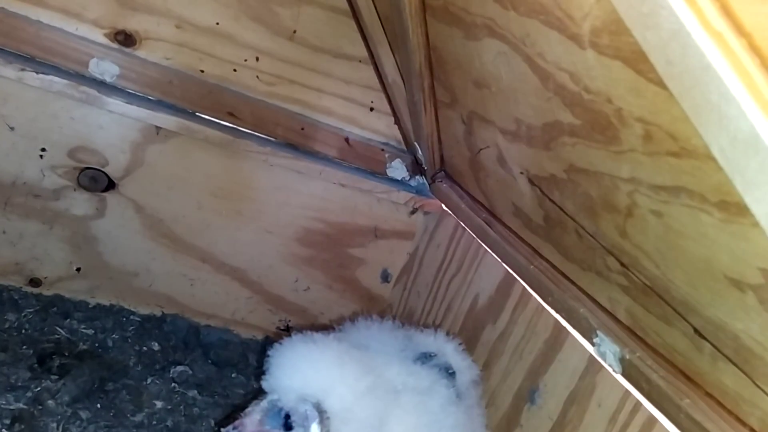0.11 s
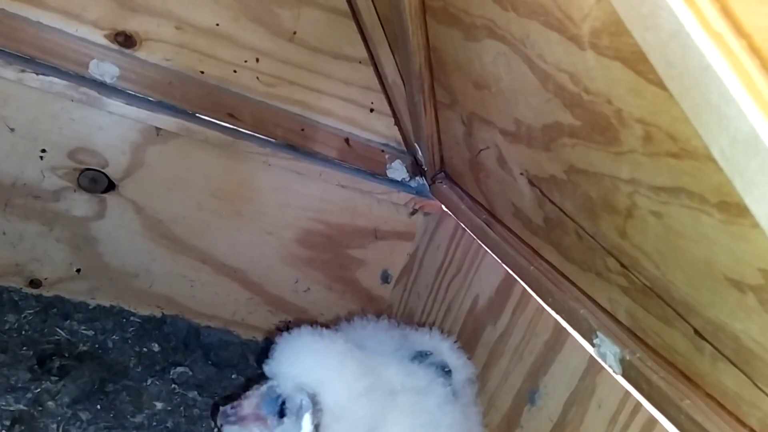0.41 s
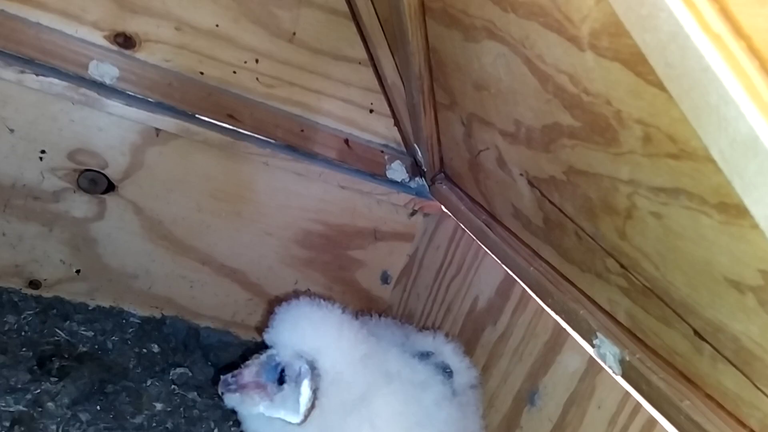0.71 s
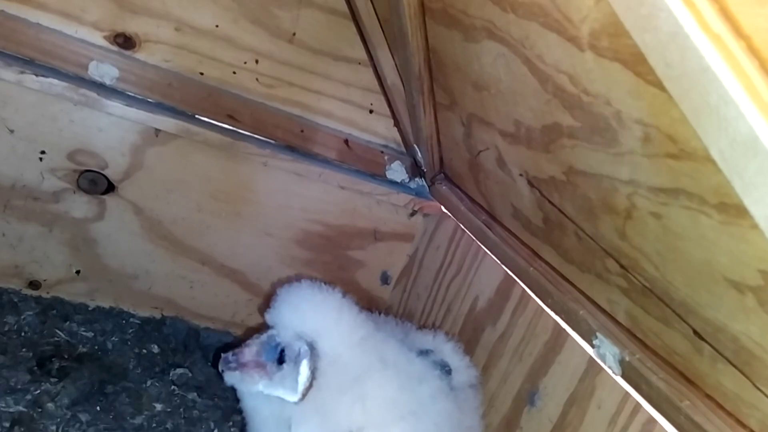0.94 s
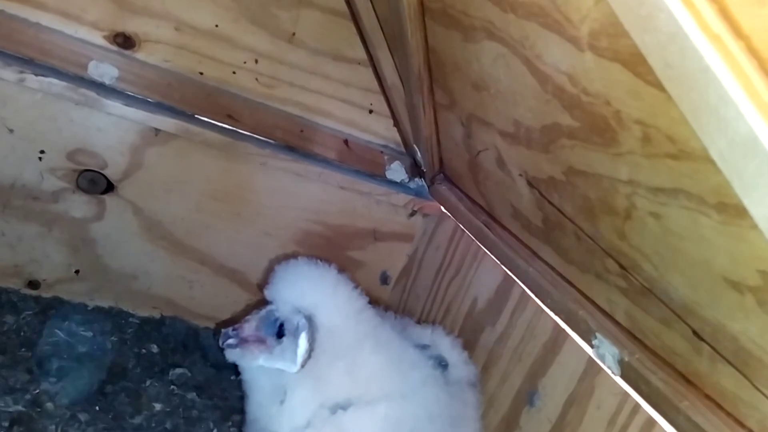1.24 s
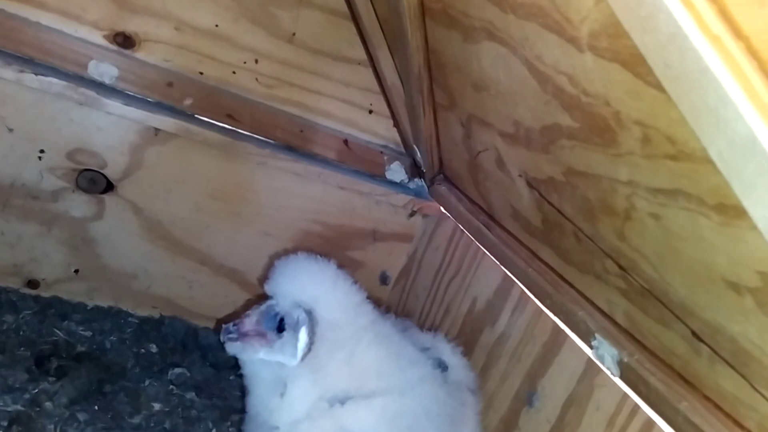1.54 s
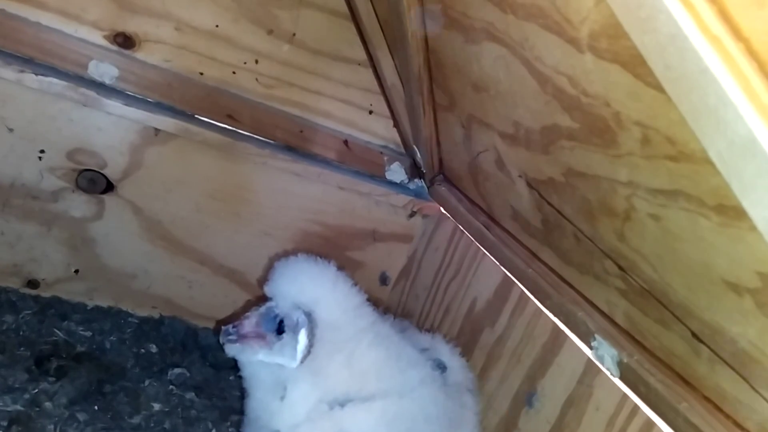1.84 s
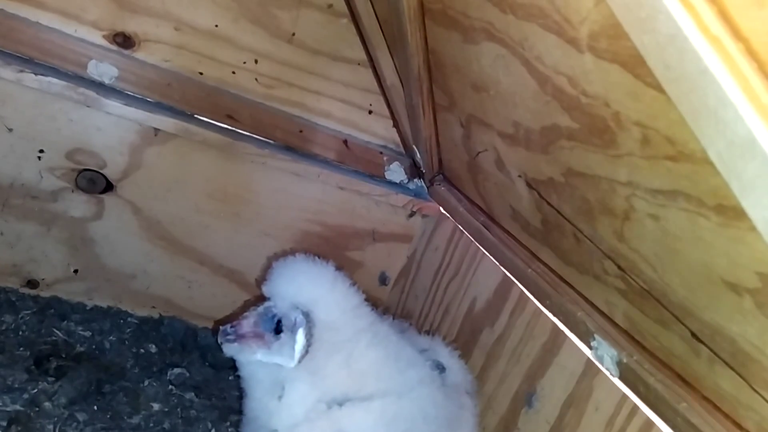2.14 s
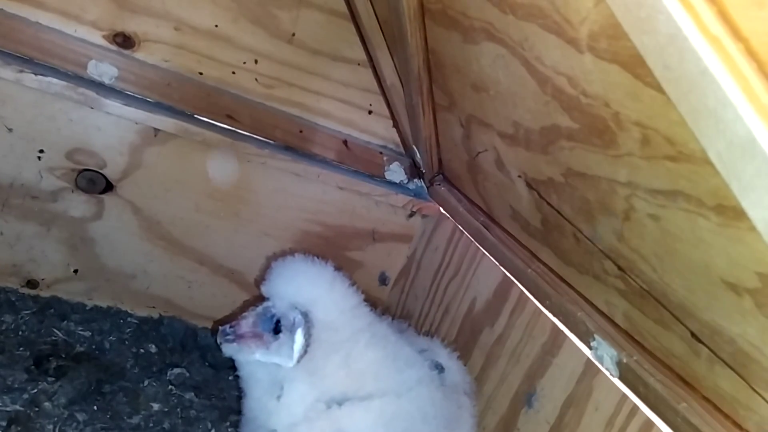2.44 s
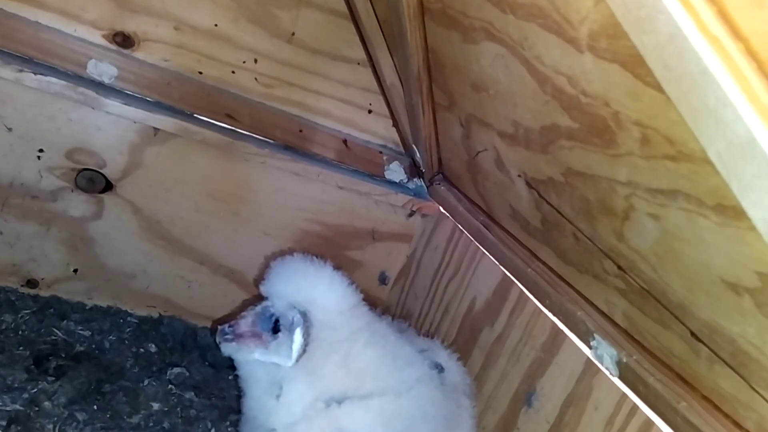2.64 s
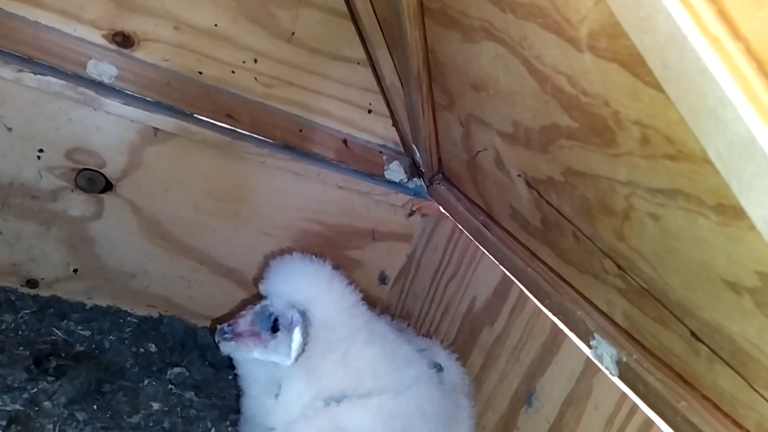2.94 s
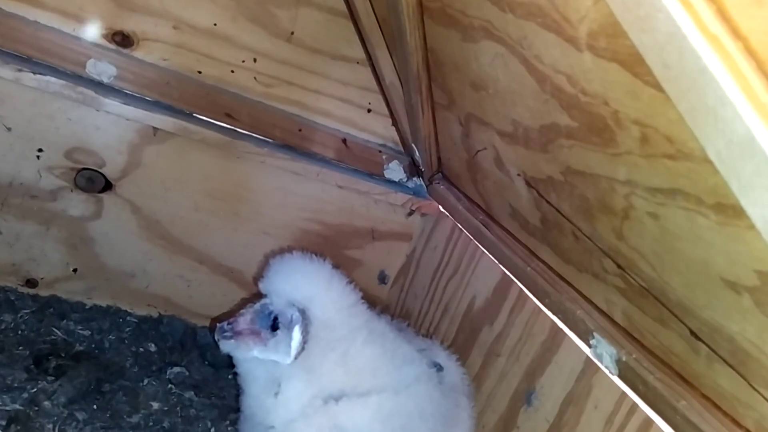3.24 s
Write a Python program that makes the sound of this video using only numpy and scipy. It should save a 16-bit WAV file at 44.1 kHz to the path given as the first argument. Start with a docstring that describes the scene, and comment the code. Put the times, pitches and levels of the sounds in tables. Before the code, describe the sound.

Owl chick gives short rasping hisses in a wooden box, then one sharp knock, over low hum

```python
"""In a plywood nest box, microphone close to the chick: a barn owl chick hisses five times.
Each hiss is rasping breath noise through a moving throat; it swells, catches into sliding squeaks and fades.
Thin wheezy whistles run under and between the hisses. Near the end of a low rubbing rustle, one sharp knock
sets the boards ringing. Short sliding tones are small birds chirping faintly outside.
Two wavering resonances, a rumble and faint air noise make the uneven hum throughout."""
import sys
import numpy as np
from scipy import signal
from scipy.fft import rfft, irfft
from scipy.io import wavfile

SR = 44100
rng = np.random.default_rng(int(sys.argv[2]) if len(sys.argv) > 2 else 0)


def wav_record(signal):
    """Record a signal, one row per channel, as 16-bit PCM in the file named by sys.argv[1]."""
    frames = np.transpose(np.atleast_2d(signal))
    bounded = np.clip(frames, -1, 1)
    # unit amplitude maps onto the largest positive 16-bit level
    quanta = np.round(bounded * 32767).astype(np.int16)
    wavfile.write(sys.argv[1], SR, quanta)


N = 147735  # length [samples]
T = np.arange(N) / SR


def amp(db):
    """Decibels to gain."""
    return 10 ** (np.asarray(db) / 20)


def unit(x):
    """Scales to rms 1."""
    return x / np.sqrt(np.mean(x ** 2) + 1e-20)


def read(points, hz):
    """Reads a (frequency, value) curve on a log-frequency axis."""
    f, value = np.transpose(points)
    return np.interp(np.log(hz + 1), np.log(f + 1), value)


def curves(table, at):
    """Reads every column of a table against its first column."""
    first, *columns = np.transpose(table)
    return [np.interp(at, first, column) for column in columns]


def add(mix, s, sound):
    """Adds a sound at time s, cut off at either end of the scene."""
    at = round(s * SR)
    sound = sound[max(-at, 0):]
    part = mix[max(at, 0):][:len(sound)]
    part += sound[:len(part)]


def noise(colour, size, treble_db=0):
    """Noise of a given colour and rms 1, with a treble shelf rising from 4000 to 5500 Hz."""
    hz = np.fft.rfftfreq(size, 1 / SR)
    shelf_db = treble_db * np.clip((hz - 4000) / 1500, 0, 1)
    spectrum = rfft(rng.standard_normal(size)) * amp(read(colour, hz) + shelf_db)
    return unit(irfft(spectrum, size))


def drift(rate_hz, size):
    """Smooth random motion, cut from a scene-long curve of rms 1."""
    hz = np.fft.rfftfreq(N, 1 / SR)
    smooth = rfft(rng.standard_normal(N)) * np.exp(-(hz / rate_hz) ** 2)
    return unit(irfft(smooth, N))[:size]


def tone(hz):
    """A sine of rms 1 along a pitch curve."""
    return np.sqrt(2) * np.sin(2 * np.pi * (np.cumsum(hz) / SR + rng.random()))


def whistle(hz, width_hz, rough=1):
    """A whistle along a pitch curve, from pure (rough 0) to a band of breath noise (rough 1)."""
    turn = 2 * np.pi * np.cumsum(hz) / SR
    rough = np.clip(rough, 0, 1)
    in_phase = 1 - rough + rough * drift(width_hz, len(hz))
    quadrature = rough * drift(width_hz, len(hz))
    return unit(in_phase * np.cos(turn) + quadrature * np.sin(turn))


def glides(rows, jitter, bend):
    """Short whistled notes that slide from one pitch to another, swelling and fading."""
    out = np.zeros(N)
    for start, length, first_hz, last_hz, db in rows:
        u = np.arange(0, length, 1 / SR) / length
        slide_hz = first_hz + (last_hz - first_hz) * u ** bend
        hz = slide_hz * (1 + jitter * drift(980, len(u)))
        add(out, start, amp(db) * np.sin(np.pi * u) * tone(hz))
    return out


# Hisses of the chick: (start [s], swell [s], hold [s], relative level [dB], treble shelf [dB],
# pitch ratio of the lower throat resonance)
HISS_CALLS = [(0.218, 0.057, 0.062, -24, 3, 1.055), (0.485, .058, 0.05, -21.5, 2, 1.065),
              (0.747, 0.062, 0.057, -24, 0.5, 1.06), (1.004, 0.062, .046, -21.5, -1.5, 1.03),
              (2.863, 0.069, 0.037, -23, 6, 1.02)]
# Two throat resonances, alike in every hiss but for that ratio:
# (time after start [s], lower [Hz], upper [Hz], lower level [dB], upper level [dB])
THROAT_MOTION = [(0, 2820, 4120, -7, 3), (0.025, 2420, 4070, -6.5, -12), (0.042, 1900, 3960, -14.5, -4),
                 (0.073, 2600, 3150, -9, -2.5), (0.093, 1940, 3750, -16.5, -6.5),
                 (.131, 1780, 3800, -11, -8), (.175, 1550, 3600, -20.5, -4)]
# Colour of the breath: (frequency [Hz], relative level [dB per Hz])
BREATH_COLOUR = [(900, -25.5), (1500, -25), (2200, -8), (2900, 3), (3750, 5), (4400, -0.5), (5050, -9),
                 (5800, -9.5), (6400, -18), (7300, -22.5), (7900, -35.5), (8500, -43)]
HISS_S, ATTACK_S, SWELL_DB, FADE_DB_PER_S = .32, 0.01, 12.5, 212.5
LOWER_WIDTH_HZ, UPPER_WIDTH_HZ = 236, 220
BREATH_DB, BREATH_RISE_S = -3.5, 0.012
RASP_DB, RASP_HZ = 2, 146  # rms depth and rate of the random level wobble
SQUEAL_DB = -4.5


def hisses():
    """Rasping air through the moving throat: attack, swell, hold and fade."""
    out, t = np.zeros(N), np.arange(0, HISS_S, 1 / SR)
    low_hz, high_hz, low_db, high_db = curves(THROAT_MOTION, t)
    for start, swell, hold, db, treble_db, ratio in HISS_CALLS:
        rise_db = SWELL_DB * np.maximum(1 - t / swell, 0)
        fade_db = FADE_DB_PER_S * np.maximum(t - swell - hold, 0)
        level = np.minimum(t / ATTACK_S, 1) ** 2 * amp(db - rise_db - fade_db)
        lower = amp(low_db) * whistle(ratio * low_hz, LOWER_WIDTH_HZ)
        upper = amp(high_db) * whistle(high_hz, UPPER_WIDTH_HZ)
        breath_rise = np.minimum(t / BREATH_RISE_S, 1)
        breath = amp(BREATH_DB) * breath_rise * noise(BREATH_COLOUR, len(t), treble_db)
        # the squeals fade out soon after the swell
        squeal = amp(SQUEAL_DB) * np.clip(3 - 2 * t / swell, 0, 1) * grains(len(t))
        rasp = amp(RASP_DB * drift(RASP_HZ, len(t)))
        add(out, start, level * rasp * (lower + upper + breath + squeal))
    return out


GRAINS_PER_S, GRAIN_TOP_HZ = 55, 3660  # typical rate; middle of the spread of first pitches
GRAIN_FALL, GRAIN_JITTER = .35, .015  # shares of the pitch


def grains(size):
    """A quick, uneven run of tiny falling squeals inside the rasp."""
    turns = np.cumsum(GRAINS_PER_S * np.exp(.35 * drift(60, size))) / SR
    u, which = turns % 1, turns.astype(int) % 64
    top_hz = GRAIN_TOP_HZ * rng.uniform(.8, 1.2, 64)[which]
    loudness = rng.uniform(0.26, 1, 64)[which]
    hz = top_hz * (1 - GRAIN_FALL * u) * (1 + GRAIN_JITTER * drift(1100, size))
    return unit(np.sin(np.pi * u) * loudness * tone(hz))


# Squeaks inside the hisses: (start [s], length [s], first pitch [Hz], last pitch [Hz], level [dB])
SQUEAK_NOTES = [(.224, 0.0032, 3860, 3700, -32.5), (.257, 0.01, 3920, 3500, -20),
                (.265, 0.014, 3924, 3500, -20.5), (.277, .011, 3080, 2410, -19.5),
                (.282, 0.0078, 3900, 3470, -16), (.293, .011, 3244, 2700, -16.5),
                (.524, 0.0078, 3730, 3500, -20.5), (.533, 0.01, 3870, 3635, -14),
                (.541, 0.0065, 3310, 2600, -27.5), (.548, 0.012, 3610, 3650, -15),
                (.554, 0.014, 3434, 2520, -13.5), (.574, .012, 3535, 3700, -16),
                (.785, 0.011, 3990, 3500, -30.5), (.796, 0.0053, 3997, 3520, -16),
                (.812, 0.0071, 3970, 3400, -18), (.818, .016, 3476, 2600, -19.5),
                (.835, 0.0066, 3900, 3464, -17.5), (1.02, .018, 3310, 2250, -29.5),
                (1.05, 0.016, 3855, 3556, -20), (1.064, 0.021, 3360, 2480, -25.5),
                (1.077, 0.044, 3660, 2590, -33), (1.093, 0.012, 3946, 3570, -19),
                (2.877, 0.0073, 3910, 3635, -39), (2.895, 0.017, 2120, 1770, -34.5),
                (2.917, 0.023, 3210, 2500, -25), (2.93, 0.018, 3090, 2540, -19.5),
                (2.97, 0.0064, 3750, 3550, -20.5)]


def squeaks():
    """The hissing voice catches into brief sliding tones of unsteady pitch."""
    return glides(SQUEAK_NOTES, jitter=0.02, bend=1.2)


# Wheezes: (start [s], length [s], level [dB], extra level of the upper whistles [dB])
WHEEZE_CALLS = [(-.25, 0.4, -33, -16), (0.334, 0.48, -33.5, -1), (0.966, 0.42, -32, 0.5),
                (1.592, 0.36, -31, -1.5)]
# Shape of every wheeze:
# (share of its length, lower [Hz], upper [Hz], lower level [dB], upper level [dB])
WHEEZE_SHAPE = [(0, 1362, 2050, -13, -39.5), (0.052, 1497, 2150, -16, -19.5), (.15, 1731, 2306, -11, -10.5),
                (.32, 1537, 2202, -8.5, -8), (.52, 1463, 2090, -1.5, -15.5), (.75, 1348, 2128, -2, -14),
                (0.879, 1343, 2130, -10, -24), (1, 1374, 2100, -19.5, -46)]
# A short soft fizz: (start [s], length [s], level [dB])
FIZZ_EVENT = (1.165, 0.22, -39)
# Colour of the fizz: (frequency [Hz], relative level [dB per Hz])
FIZZ_SPECTRUM = [(2600, -47.5), (3400, 14), (4300, 9.5), (5200, 4), (5700, -47)]
WHEEZE_WIDTH_HZ, WHEEZE_ROUGH = 116, 0.52  # lower whistle: part pure, part breath
TOP_HZ, TOP_DB = 3270, -3
FLUTTER_HZ, FLUTTER_DB = 47.23, 0.6  # mean rate and rms depth


def wheezes():
    """Two breathy, fluttering whistles rise quickly and sink slowly under a weak third; one ends in a fizz."""
    out = np.zeros(N)
    for start, length, db, overtones_db in WHEEZE_CALLS:
        u = np.arange(0, length, 1 / SR) / length
        low_hz, high_hz, low_db, high_db = curves(WHEEZE_SHAPE, u)
        lower = amp(low_db) * whistle(low_hz, WHEEZE_WIDTH_HZ, WHEEZE_ROUGH)
        top_fade = np.minimum(2 * (1 - u) ** 2, 1)
        top = amp(TOP_DB) * top_fade * whistle(np.full(len(u), TOP_HZ), 140)
        upper = amp(high_db + overtones_db) * (whistle(high_hz, 130) + top)
        flutter_db = FLUTTER_DB * tone(FLUTTER_HZ * (1 + 0.23 * drift(30, len(u))))
        add(out, start, amp(db + flutter_db) * (lower + upper))
    start, length, db = FIZZ_EVENT
    u = np.arange(0, length, 1 / SR) / length
    fizz_shape = 2 * np.sin(np.pi * u) * (1 - u)
    add(out, start, amp(db) * fizz_shape * noise(FIZZ_SPECTRUM, len(u)))
    return out


# Blow and rebound of the knock: (delay [s], level [dB])
KNOCK_BLOWS = [(0, 0.5), (.0045, -3)]
# Ringing modes of the boards: (frequency [Hz], level [dB], decay by 60 dB [s])
WOOD_MODES = [(303, -28, 0.31), (406, -22.5, 0.25), (508.4, -18.5, .18), (660.5, -16.5, 0.16),
              (732, -24, 0.11), (817, -10.5, 0.15), (855.5, -18, 0.22), (960, -18.5, 0.21),
              (1170, -27, 0.1), (1395, -17.5, 0.043), (1497, -19, .05), (1928, -16, 0.068),
              (2344, -14.5, 0.083), (2840, -21, 0.061)]
# Colour of the crack: (frequency [Hz], relative level [dB per Hz])
CRACK_COLOUR = [(200, -11.5), (700, 3.5), (2200, 1), (3300, -12.5), (4800, -6.5), (6500, -31), (8200, -65)]
# Colour of the dense ring of the boards: (frequency [Hz], relative level [dB per Hz])
THUD_COLOUR = [(200, -38), (380, -6), (570, -5.5), (780, -8), (1000, -8), (1500, -17), (3000, -26.5),
               (6000, -54.5)]
KNOCK_S = 1.9058
CRACK_DB, CRACK_T60_S = -7, 0.017
THUD_DB, THUD_T60_S = -17, 0.28


def knock():
    """A hard knock that rebounds: each blow cracks, and the boards ring."""
    out, t = np.zeros(N), np.arange(SR // 2) / SR
    ring = np.zeros(len(t))
    for k, (hz, db, t60) in enumerate(WOOD_MODES):
        ring += (-1) ** k * amp(db - 60 * t / t60) * np.sin(2 * np.pi * hz * t)
    thud = amp(THUD_DB - 60 * t / THUD_T60_S) * noise(THUD_COLOUR, len(t))
    add(out, KNOCK_S, np.minimum(t / 0.0036, 1) * thud)
    for delay, db in KNOCK_BLOWS:
        crack = amp(CRACK_DB - 60 * t / CRACK_T60_S) * noise(CRACK_COLOUR, len(t))
        add(out, KNOCK_S + delay, amp(db) * np.minimum(t / 0.0002, 1) * (ring + crack))
    return out


# Course of the rubbing: (time [s], level [dB])
RUSTLE_LEVEL = [(1.1, -54.5), (1.188, -31.5), (1.554, -29.5), (1.776, -38.5), (1.94, -32.5), (2.034, -35.5),
                (2.048, -63), (2.1, -46)]
# Colour of the rubbing: (frequency [Hz], relative level [dB per Hz])
RUB_COLOUR = [(130, -28.5), (190, -3.5), (232, -5), (272, -2.5), (300, -3), (335, -0.5), (375, -15.5),
              (480, -21.5), (700, -61)]
RUB_DB = -1
BOOM_HZ, BOOM_WIDTH_HZ, BOOM_DB = 252.8, 5.8, -3.5  # one box resonance stands out


def rustle():
    """A dull rubbing noise that booms in the box."""
    s, db = np.transpose(RUSTLE_LEVEL)
    level = amp(np.interp(T, s, db, left=-120, right=-120))
    rub = amp(RUB_DB) * noise(RUB_COLOUR, N)
    boom = amp(BOOM_DB) * whistle(np.full(N, BOOM_HZ), BOOM_WIDTH_HZ, rough=0.15)
    return level * (rub + boom)


# Small birds outside: (start [s], length [s], first pitch [Hz], last pitch [Hz], level [dB])
CHIRP_NOTES = [(1.693, 0.023, 4150, 3890, -41.5), (1.835, 0.013, 4060, 3960, -41.5),
               (1.872, 0.033, 4260, 3930, -37.5), (2.038, .024, 4220, 3960, -42.5),
               (2.075, 0.027, 4200, 3920, -36), (2.254, 0.02, 4090, 3980, -40),
               (2.292, .028, 4214, 3963, -36), (2.805, 0.03, 3020, 3980, -45),
               (.905, 0.14, 7660, 7730, -55.5), (1.635, 0.18, 7330, 7600, -54.5),
               (2.06, 0.1, 6780, 7240, -58.5), (2.03, 0.083, 5910, 5650, -57)]


def chirps():
    """Small birds outside: faint short tones that slide almost cleanly."""
    return glides(CHIRP_NOTES, jitter=0.0048, bend=1.3)


# Two low resonances of the box: (time [s], lower level [dB], upper level [dB])
HUM_LEVELS = [(0.0, -27.5, -37), (0.06, -30, -31.5), (0.12, -41.5, -52), (0.16, -35, -35.5),
              (0.37, -26.5, -33), (0.45, -40.5, -20), (0.55, -24, -42.5), (0.6, -32.5, -25.5),
              (0.66, -24.5, -23), (0.75, -45, -39), (0.88, -26, -33.5), (1.03, -27, -26.5),
              (1.06, -23.5, -52), (1.15, -27.5, -23.5), (1.3, -32.5, -34.5), (1.33, -31, -36),
              (1.48, -24, -26), (1.55, -31, -41.5), (1.72, -25.5, -23), (2.02, -37, -36),
              (2.09, -23.5, -37.5), (2.27, -27, -26.5), (2.29, -33, -27.5), (2.54, -33, -32),
              (2.58, -22, -37.5), (2.61, -45, -42.5), (2.65, -25.5, -29.5), (2.77, -50.5, -53),
              (2.81, -32, -42), (3.0, -31, -22), (3.09, -49.5, -28), (3.13, -37.5, -46), (3.16, -28, -31),
              (3.24, -51.5, -57), (3.28, -33, -28), (3.35, -43.5, -43.5)]
# Colour of the rumble: (frequency [Hz], relative level [dB per Hz])
RUMBLE_COLOUR = [(20, -52.5), (38, -30.5), (60, -4.5), (90, 3), (130, -1.5), (185, -6), (240, -21),
                 (330, -26.5), (600, -70)]
# Colour of the air noise: (frequency [Hz], relative level [dB per Hz])
AIR_COLOUR = [(180, -20.5), (300, -4.5), (750, -4), (1760, -14), (4500, -16.5), (6800, -28), (7500, -43.5),
              (8200, -55)]
HUM_HZ, HUM_WAVER = (85.5, 125.3), 0.02208  # mean pitches; rms waver as a share of the pitch
RUMBLE_DB, RUMBLE_FOLLOW = -32.5, 0.55  # level at the median hum; dB per dB of hum
AIR_DB, AIR_FOLLOW = -51, 0.46


def hum():
    """Two wavering low resonances in a rumble; rumble and faint air noise follow their level."""
    levels = curves(HUM_LEVELS, T)
    lines = np.zeros(N)
    for hz, db in zip(HUM_HZ, levels):
        lines += amp(db - 1.5) * tone(hz * (1 + HUM_WAVER * drift(14, N)))
    swell_db = 10 * np.log10(sum(amp(db) ** 2 for db in levels))
    swell_db = swell_db - np.median(swell_db)
    rumble = amp(RUMBLE_DB + RUMBLE_FOLLOW * swell_db) * noise(RUMBLE_COLOUR, N)
    air = amp(AIR_DB + AIR_FOLLOW * swell_db) * noise(AIR_COLOUR, N)
    return lines + rumble + air


# Reverberation of the plywood box: (frequency [Hz], decay by 60 dB [s])
BOX_DECAY = [(200, .26), (900, 0.28), (2500, 0.21), (7000, 0.2)]


def box(x, wet_db, stretch=1):
    """Adds dense, short reflections of the plywood walls; stretch lengthens their decay."""
    late_enough = np.arange(SR // 2) > .002 * SR
    taps = rng.standard_normal(SR // 2) * (rng.random(SR // 2) < .1) * late_enough
    hz, t, z = signal.stft(taps, SR, nperseg=256)
    t60 = stretch * read(BOX_DECAY, hz)[:, None]
    tail = signal.istft(z * amp(-60 * t / t60), SR, nperseg=256)[1]
    return x + amp(wet_db) * signal.oaconvolve(x, tail / np.linalg.norm(tail))[:N]


def scene():
    """All the sounds in and around the box, from the chick to the hum."""
    owl = box(hisses(), wet_db=-6) + box(squeaks(), wet_db=-6.5) + box(wheezes(), wet_db=-12.5)
    wood = box(knock(), wet_db=-10) + rustle()
    birds = box(chirps(), wet_db=-7.5, stretch=2.7)
    return (owl + wood + birds + hum())[None]


CUT_HZ = 8250


def record(dry):
    """Clips peaks near full scale, then dulls the sound with a low-pass at CUT_HZ."""
    low_pass = signal.firwin(301, CUT_HZ, window=("kaiser", 9), fs=SR)
    return signal.oaconvolve(np.clip(dry, -.88, .88), low_pass[None], "same")


dry = scene()
out = record(dry)
wav_record(out)
```